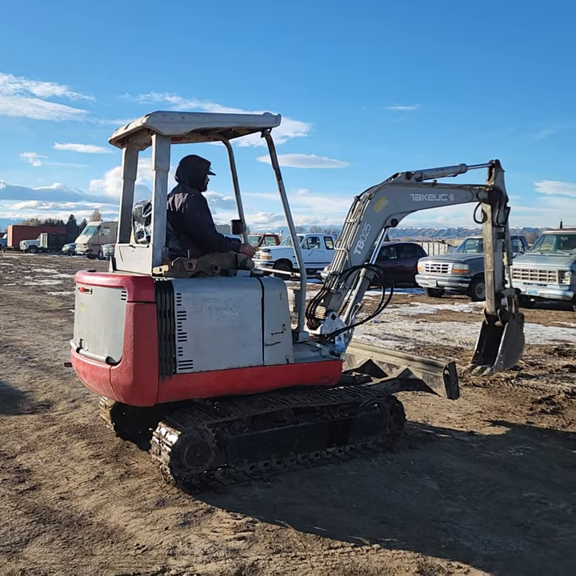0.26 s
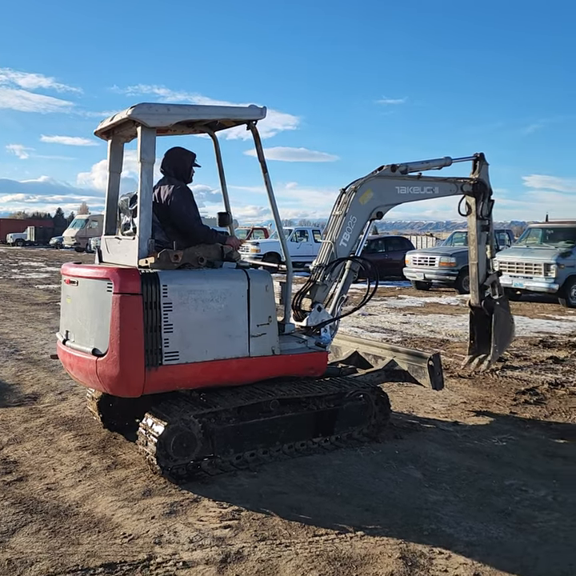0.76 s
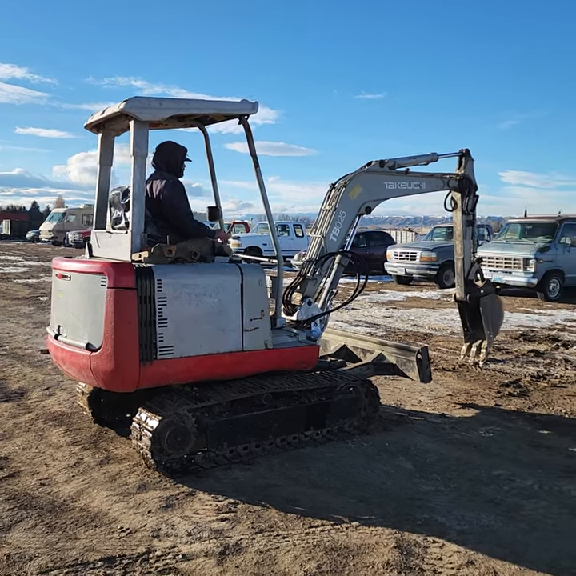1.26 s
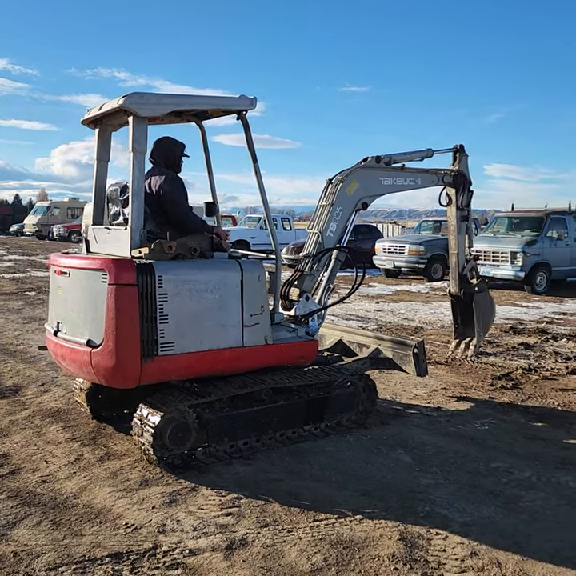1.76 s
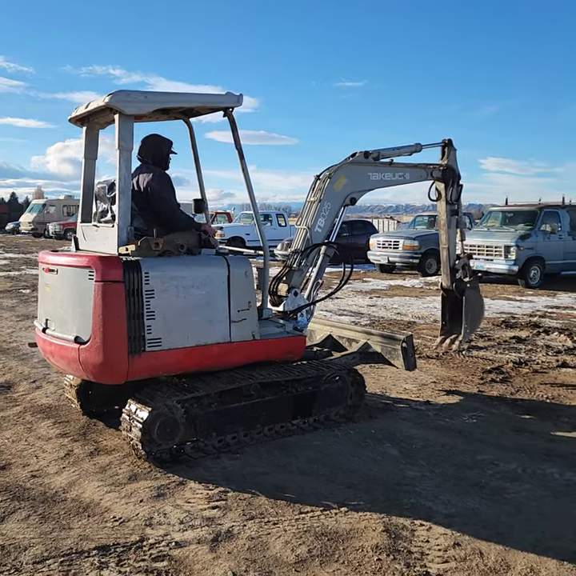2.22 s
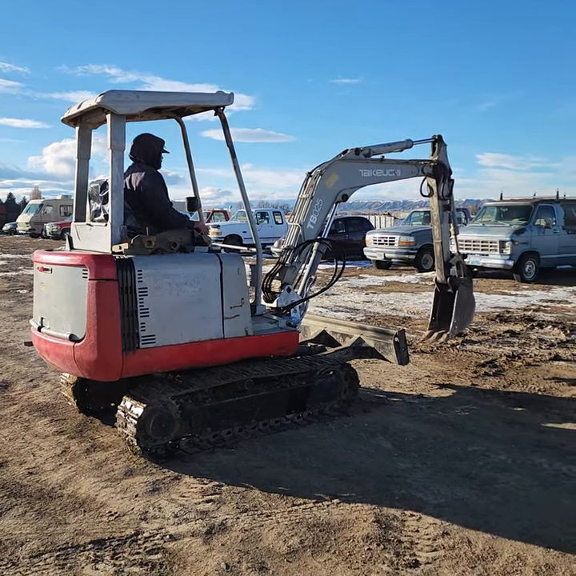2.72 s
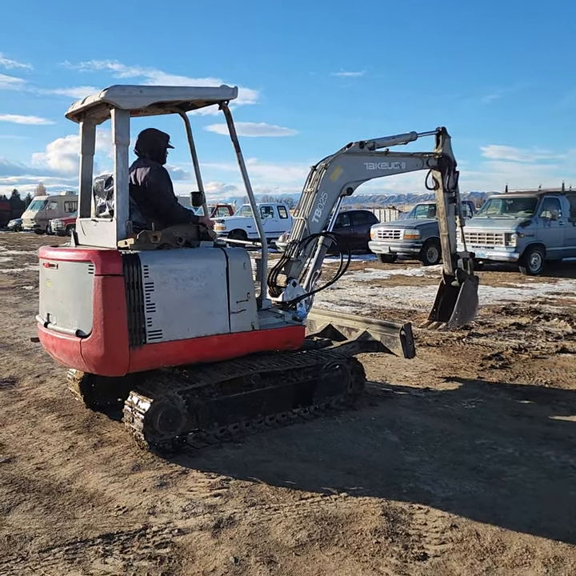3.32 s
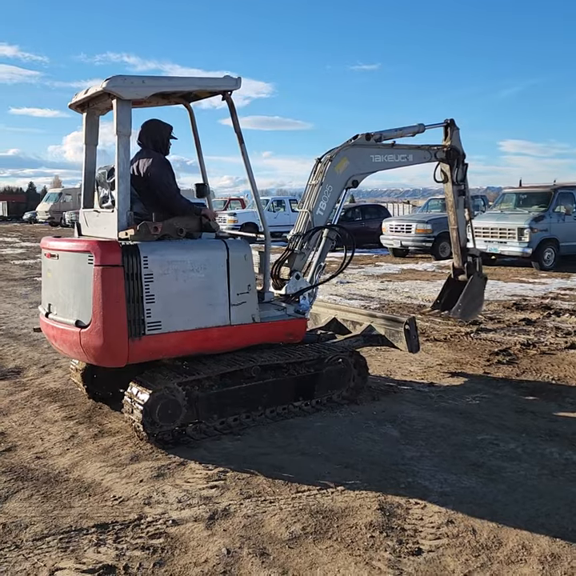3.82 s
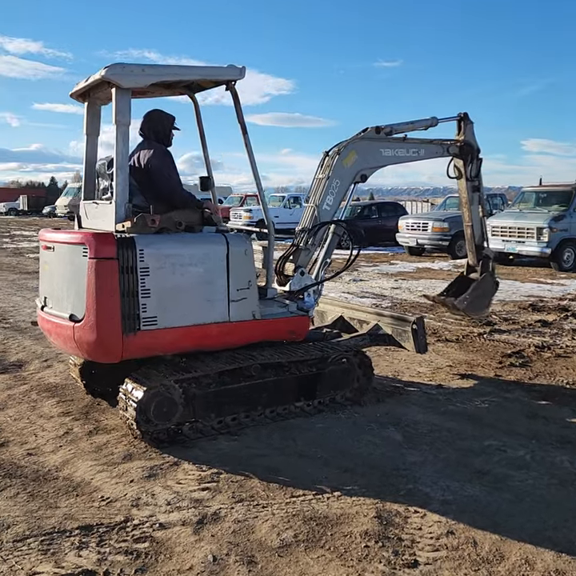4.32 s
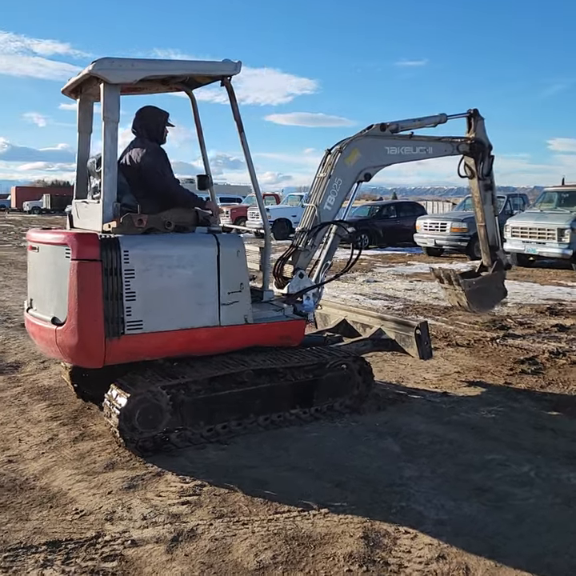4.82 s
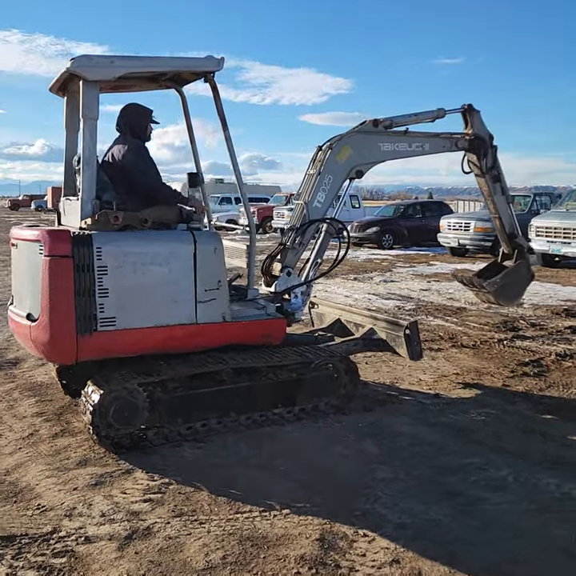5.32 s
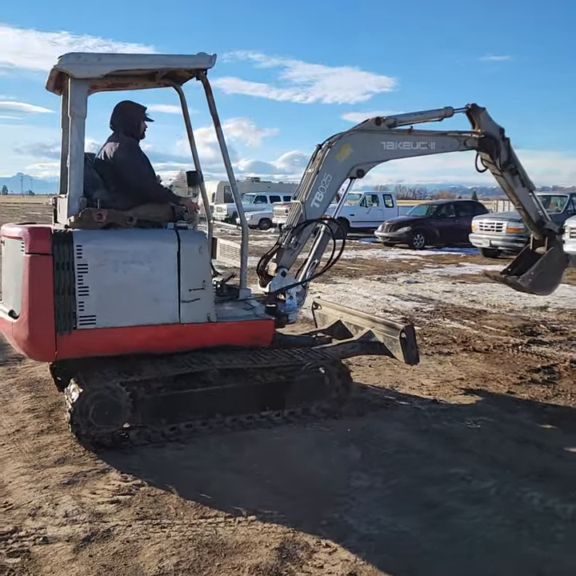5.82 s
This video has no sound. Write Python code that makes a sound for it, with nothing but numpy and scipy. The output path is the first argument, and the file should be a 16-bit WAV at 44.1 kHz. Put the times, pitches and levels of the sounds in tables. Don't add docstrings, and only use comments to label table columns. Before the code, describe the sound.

Close outdoor phone pickup of a mini excavator working at constant engine speed: fast uneven diesel knocking, ticking valves, low boom that swells and ducks, and a thin gear and pump whine. Loose arm pins click now and then, clearest around two seconds. Brief wind thumps come early; in the last stretch thick gusts pop and crackle mainly on the right.

```python
import sys
import numpy as np
from scipy import signal
from scipy.fft import rfft, irfft, next_fast_len
from scipy.io import wavfile
from scipy.ndimage import uniform_filter1d

SR = 44100
rng = np.random.default_rng(int(sys.argv[2]) if len(sys.argv) > 2 else 0)


def persist_wave(psi):
    counts = np.round(np.clip(psi, -1, 1) * 32767).astype(np.int16)
    wavfile.write(sys.argv[1], SR, np.atleast_2d(counts).T)


def gain_from_db(level_db):
    decades = np.asarray(level_db, float) / 20
    return 10 ** decades


N = 267687
SIZE = next_fast_len(N + 8192)
HZ = np.maximum(np.arange(SIZE // 2 + 1) * SR / SIZE, 1)

# (time [s], speed [four-stroke cycles/s])
ENGINE_SPEED = [(0, 20.76), (.5, 20.78), (.7, 20.85), (1.3, 20.86), (1.6, 21.33), (1.85, 20.87),
                (3.05, 20.88), (3.3, 20.76), (3.55, 20.89), (4.65, 20.92), (4.9, 20.78), (5.3, 20.8),
                (5.55, 20.85), (5.75, 20.74), (6.07, 20.74)]
START_CYCLE = .81
# (time [s], boom passed [dB])
FILTER_OPENING = [(0, -19.5), (.74, -16.5), (1.25, -15.5), (1.5, -12), (1.62, -15.5), (1.7, -20),
                  (1.91, -17), (2.18, -21.5), (2.45, -14.5), (3.01, -24.5), (3.23, -17.5), (3.77, -17),
                  (4.36, -25), (4.56, -16), (4.85, -13.5), (5.3, -13), (5.46, -14.5), (6.07, -16)]
# (deepest time [s], depth [dB], half length [s])
FILTER_DUCKS = [(.01, -3, .1), (0.38, -6, 0.078), (0.575, -6, 0.043), (.84, -2.5, .08), (1.085, -7, 0.057),
                (1.317, -8, 0.024), (1.43, -4.5, 0.093), (1.54, -4, 0.047), (1.973, -5, 0.04),
                (2.13, -8, 0.038), (2.298, -6, .1), (2.527, -5, 0.08), (2.704, -7, 0.11),
                (2.917, -3.5, 0.069), (3.13, -7.5, 0.11), (3.3, -9.5, 0.053), (3.5, -8, .13),
                (3.7, -5.5, 0.055), (3.877, -9, 0.071), (3.974, -3.5, 0.059), (4.19, -8, 0.14),
                (4.388, -9, 0.023), (4.605, -5, 0.036), (4.765, -4.5, 0.096), (4.95, -6, 0.12),
                (5.14, -4, 0.16), (5.4, -3, .05), (5.554, -1.5, .11), (5.708, -10, 0.037),
                (5.934, -1.5, 0.083)]
# (order [per cycle], level against the boom [dB])
EXHAUST_TONES = [(3, -50.5), (5, -22.5), (6, -0.5), (7, -33), (9, -16.5), (12, -30.5)]
# (time [s], clatter [dB], ticks against it [dB])
CLATTER_LEVELS = [(0, -31.5, -9), (1.4, -31, -9.5), (1.76, -33.5, -9), (2.2, -32, -11), (2.95, -33.5, -9.5),
                  (3.6, -32, -9), (4.3, -32, -11.5), (4.82, -31, -11.5), (5.12, -32, -10), (5.3, -32, -10.5),
                  (5.75, -34.5, -10.5), (6.07, -34, -11.5)]
# (place [0-1 of cycle], knock [dB], tick [dB])
CYCLE_BLOWS = [
    (.15, 1, -1.5),
    (.43, 7, 2),
    (.53, 5.5, -4.5),
    (.70, 2.5, -14),
    (0.8, 0.5, 1),
    (0.959, -7.5, -9.5),
]
BLOW_RINGS = [96, 93, 86, 89, 98, 78]
RING_HABIT = .04
KNOCK_MEMORY, TICK_MEMORY = .36, .2
LOUDEST = 1.6
# (frequency [Hz], level [dB per Hz])
BONNET_TONE = [(140, -56.5), (230, -9.5), (358, -7), (387, -8.5), (504, -1.5), (638, -9), (1370, -13),
               (1860, -9), (2400, -21), (3120, -56), (5280, -120)]
# (frequency [Hz], width [Hz], level [dB])
BONNET_PANELS = [(508, 110, -6.5), (930, 110, 5), (1163, 200, 3), (1410, 43, -1.5), (1847, 160, -3),
                 (2057, 160, 4.5)]
# (frequency [Hz], level [dB per Hz])
TICK_TONE = [(1410, -19), (2400, -1.5), (2720, -3), (3090, 0), (3680, -5), (4170, -5.5), (5130, -8.5),
             (7030, -7), (7670, -5), (8640, -10), (10000, -20), (11000, -20), (12200, -15), (15100, -19),
             (15900, -16.5)]
HISS_DB = -52.5
SWING_S, SHADE_DB_PER_S = 4.66, -6
WHINE_ORDERS = [17, 20, 21, 23, 24, 25, 26, 27, 28, 33, 36, 40, 43, 45, 48, 49, 54, 56, 57, 58, 60, 72, 77,
                86, 88, 93, 96]
WHINE_LEVELS = [-13, -12.5, -11, -14, -3, -9.5, -14, -11.5, -14.5, -15.5, -13.5, -12.5, -17.5, -21.5, -18.5,
                -16.5, -16.5, -12, -10, -15, -14, -20, -19.5, -11, -14.5, -15.5, -13.5]
# (frequency [Hz], left minus right [rad])
PORT_PHASE = [(20, 0), (130, -.08), (950, .2), (1460, -.3), (2330, 1.7), (3450, 2.6), (4310, 4.9),
              (5000, 6.2), (6290, 6.8), (15600, 7.8)]
# (frequency [Hz], left minus right [dB])
PORT_BALANCE = [(60, -3), (200, 0.5), (700, 0.5), (1290, -0.5), (2380, -3), (4400, 3.5), (8120, 1.5),
                (15000, 5.5)]
# (frequency [Hz], share common to both ports [0-1])
DIRECT_SHARE = [(100, 0.32), (300, 0.63), (600, 0.76), (1200, 0.71), (2200, 0.38), (4000, 0.47),
                (8000, 0.075), (15000, .25)]
# (time [s], rumble [dB])
BREEZE = [(0.0, -31), (0.05, -31), (1.28, -29), (1.6, -18.5), (1.74, -28.5), (2.21, -31), (2.3, -32),
          (2.36, -34.5), (4.63, -32), (4.87, -25.5), (4.9, -27.5), (5.34, -26), (6.05, -24.5), (6.07, -15)]
# (frequency [Hz], level [dB per Hz])
RUMBLE_TONE = [(15, 7), (30, -2), (60, 10.5), (95, 15.5), (160, 10.5), (230, -1.5), (400, -46)]
RUMBLE_SWAY_DB = 1
# (time [s], peak [dB], ring [Hz], left minus right [dB], decay [ms])
PIN_KNOCKS = [(.9364, -26, 12500, -6, 1.), (2.077, -36, 2900, -13, 22), (2.0965, -17, 2200, -11.5, 5),
              (2.1034, -18, 3300, -6, 2.5), (2.108, -29, 3300, -8, 9), (2.635, -30, 3200, 9, 9),
              (2.66, -33, 3000, 5, 8), (3.6711, -30, 7500, -7, 3), (3.6705, -33, 13000, 3, 2),
              (3.695, -23, 4200, 8, 1.7), (5.122, -27, 4800, 11, 3.6), (5.11, -27, 3200, 7, 9),
              (5.157, -31, 3040, 7, 32), (5.159, -28, 4000, 6, 16), (5.325, -24, 3900, 4, 9.1),
              (5.338, -25, 3000, 5, 11), (5.567, -33, 3100, 6, 32), (5.6894, -34, 3780, -1, 5),
              (5.7444, -36, 3200, 11, 6.5)]
RING_WIDTH_HZ, RING_KNEE_MS = 4200, 3.7
# (time [s], hold [s], buffeting [dB], left minus right [dB], scratch [dB])
GUST_PUFFS = [(1.29, .14, -32, -7, -36), (1.517, .01, -23, 3, -29), (1.59, .01, -19.5, 9, -23),
              (3.85, .01, -25, 1, -28), (4.79, 0.041, -29, -13, -27), (4.865, .005, -23, -3, -38),
              (5.301, .01, -17, -17, -21), (5.345, .02, -16, -11, -29), (5.42, .015, -22.5, -22, -24),
              (5.46, .03, -26, -27, -28.5), (5.553, 0.0092, -25.5, -33.5, -33),
              (5.607, 0.027, -21.5, -9, -38), (5.673, 0.068, -23.5, -14, -37), (5.78, 0.095, -26, -13, -40),
              (5.917, 0.11, -25, -4, -40)]
PUFF_RISE_DB_PER_S, PUFF_FALL_DB_PER_S = 450, 400
# (frequency [Hz], level [dB per Hz])
BUFFET_TONE = [(20, -39), (60, 2), (130, 5), (270, -11), (450, -10), (800, -19), (1600, -68), (6000, -120)]
# (frequency [Hz], level [dB per Hz])
SCRATCH_TONE = [(100, -43), (350, -25), (600, -4.5), (1000, -9), (1400, -12), (2200, -35), (6000, -120)]
# (time [s], peak [dB], left minus right [dB], pitch [Hz])
EDDY_POPS = [(1.513, -7.5, 12, 300), (1.597, -9, 19, 330), (1.63, -5.5, 7, 73), (2.285, -20, -4, 45),
             (2.49, -23, 0, 45), (3.85, -21, 3, 250), (4.23, -28, 0, 45), (4.72, -32, 2, 60),
             (4.80, -13, -18, 400), (4.845, -5.5, 18, 70), (5.226, -17, -25, 1100),
             (5.253, -9.5, -22, 1000), (5.266, -7, -20, 500), (5.282, -3.5, -20, 660),
             (5.29, -12.5, -3, 60), (5.304, -2.5, -29, 835), (5.343, -13, -20, 450),
             (5.356, -5.5, -20, 710), (5.371, -17, -20, 600), (5.397, -9, -23, 650),
             (5.435, -5.5, -20, 600), (5.46, -7, -24, 714), (5.489, -11, -20, 550), (5.52, -10, -21, 418),
             (5.556, -10, -24, 250), (5.675, -7.5, -24, 456), (5.72, -10, -20, 700), (5.775, -4, -10, 70)]


def on_hz(table):
    hz, value = np.transpose(table)
    return np.interp(np.log(HZ), np.log(np.maximum(hz, 1)), value)


def on_time(table):
    s, *columns = np.transpose(table)
    return [np.interp(np.arange(N) / SR, s, column) for column in columns]


def through(x, response):
    return irfft(rfft(x, SIZE) * response, SIZE)[..., :N]


def causal(db):
    cepstrum = irfft(db * np.log(10) / 20, SIZE)
    cepstrum[1:SIZE // 2] *= 2
    cepstrum[SIZE // 2 + 1:] = 0
    return np.exp(rfft(cepstrum))


def unit(x):
    return x / np.sqrt(np.mean(x ** 2))


def waver(db, rate, to=gain_from_db):
    steps = np.repeat(rng.standard_normal(int(N / SR * rate) + 2), 8)
    slow = 0.64 * uniform_filter1d(uniform_filter1d(steps, size=8), size=8)
    return np.interp(np.arange(N) * rate * 8 / SR, np.arange(len(slow)), to(db * slow))


def port_lead():
    side = np.array([[.5], [-.5]])
    return gain_from_db(side * on_hz(PORT_BALANCE)) * np.exp(1j * side * on_hz(PORT_PHASE))


def ports(sources, body):
    share = np.clip(on_hz(DIRECT_SHARE), 0, 1)
    common, *own = rfft(sources, SIZE) * body
    lead = port_lead()
    direct = np.sqrt(share) * common * lead
    scattered = np.sqrt(1 - share) * np.array(own) * abs(lead)
    return unit(irfft(direct + scattered, SIZE)[:, :N])


def wind_filter():
    t = np.arange(N) / SR
    ducks = sum(db * np.maximum(1 - abs(t - s) / half, 0) for s, db, half in FILTER_DUCKS)
    return on_time(FILTER_OPENING)[0] + ducks


def tones(cycle, orders, wobble_db, rate, slip):
    total = 0
    for order, db in orders:
        level = gain_from_db(db) * waver(wobble_db, rate) * np.sqrt(2)
        angle = 2 * np.pi * (round(order) * cycle + rng.random())
        total = total + level * np.sin(angle + waver(slip * order, rate, to=np.positive))
    return total


def exhaust_boom(cycle, boom_db):
    return gain_from_db(boom_db) * tones(cycle, EXHAUST_TONES, wobble_db=-0.8, rate=19, slip=0.01)


def rattle(cycle, memory, size=2112):
    turns = rng.standard_normal((3, int(cycle[-1]) + 2, size))
    turns = signal.lfilter([np.sqrt(1 - memory ** 2)], [1, -memory], turns, axis=1)
    return turns.reshape(3, -1)[:, (cycle * size).astype(int)]


def bursts(cycle, sizes_db, rise, decay, scatter_db, bed, jitter, repeat, memory):
    gate, habit = bed, 0
    for (place, *_), db, order in zip(CYCLE_BLOWS, sizes_db, BLOW_RINGS):
        size, late = rng.standard_normal((int(cycle[-1]) + 3, 2)).T
        since_start = cycle + 1 - place
        turn, since = since_start.astype(int), since_start % 1
        strength = gain_from_db(db + scatter_db * np.clip(size, -3, LOUDEST))[turn]
        burst = strength * (np.exp(-since / decay) - np.exp(-since / min(rise, .8 * decay)))
        habit = habit + burst * np.sin(2 * np.pi * order * (since + jitter * late[turn]))
        gate = gate + burst
    fresh = rattle(cycle, memory) * gate
    same = unit(habit) * np.std(fresh[0])
    fresh[0] = np.sqrt(1 - repeat) * fresh[0] + np.sqrt(repeat) * same
    return fresh


def clatter(cycle, clatter_db, treble_db, duck_db):
    _, knock_db, tick_db = np.transpose(CYCLE_BLOWS)
    panels = sum(db / (1 + (2 * (HZ - hz) / width) ** 2) for hz, width, db in BONNET_PANELS)
    knock = bursts(cycle, knock_db, rise=0.042, decay=0.069, scatter_db=0.5, bed=0.88, jitter=0.0012,
                   repeat=RING_HABIT, memory=KNOCK_MEMORY)
    knock = ports(knock, causal(on_hz(BONNET_TONE + [(6000, -77)]) + panels))
    knock = knock + (gain_from_db(duck_db) - 1) * through(knock, 1 / (1 + (HZ / 330) ** 6))
    ticks = bursts(cycle, tick_db, rise=0.033, decay=0.063, scatter_db=4.5, bed=0.45, jitter=0.0026,
                   repeat=0, memory=TICK_MEMORY)
    ticks = ports(ticks, causal(on_hz([(600, -105)] + TICK_TONE)))
    hiss = through(ticks, 1 / (1 + (9500 / HZ) ** 12))
    hiss_db = HISS_DB + SHADE_DB_PER_S * np.maximum(np.arange(N) / SR - SWING_S, 0)
    lower_ticks = gain_from_db(clatter_db + treble_db + 2.0) * (ticks - hiss)
    return gain_from_db(clatter_db + 2.0) * knock + lower_ticks + gain_from_db(hiss_db + 11.0) * hiss


def whine(cycle, clatter_db):
    orders = zip(WHINE_ORDERS, WHINE_LEVELS)
    return gain_from_db(clatter_db - 2.5) * tones(cycle, orders, wobble_db=3.5, rate=15, slip=0.02)


def wind_rumble(rumble_db, alike=0.94):
    both, *own = rng.standard_normal((3, N))
    air = np.sqrt(alike) * both + np.sqrt(1 - alike) * np.array(own)
    rumble = unit(through(air, gain_from_db(on_hz(RUMBLE_TONE))))
    return gain_from_db(rumble_db + 4.5) * waver(RUMBLE_SWAY_DB, 7.4) * rumble


def pin_knocks(grit=0.5):
    out, t = np.zeros((2, N + 4096)), np.arange(2048) / SR
    for s, db, hz, pan_db, ms in PIN_KNOCKS:
        width = RING_WIDTH_HZ / (1 + (ms / RING_KNEE_MS) ** 1.24)
        edges = np.clip([hz - width / 2, hz + width / 2], 300, .45 * SR)
        blow = grit * rng.standard_normal(len(t)) * np.exp(-t * 1000 / ms)
        blow[0] = 1 / (1 + ms / RING_KNEE_MS)
        ring = signal.butter(2, edges, "band", fs=SR, output="sos")
        burst = signal.sosfilt(ring, blow)
        burst = burst / abs(burst).max() * gain_from_db(db)
        at = int(s * SR)
        out[0, at:at + len(t)] += burst * gain_from_db(pan_db / 2)
        out[1, at + 6:at + 6 + len(t)] += burst * gain_from_db(-pan_db / 2)
    return out[:, :N]


def wind_gusts(pop_db=4.0, leak=0.12, calm_db=-32.0):
    crackle = unit(np.array([waver(pop_db, 90) * rng.standard_normal(N) for _ in range(2)]))
    t, buffet, scratch = np.arange(N) / SR, 0, 0
    for s, hold, db, pan_db, scratch_db in GUST_PUFFS:
        rise_db = np.minimum(PUFF_RISE_DB_PER_S * (t - s), 0)
        fall_db = np.minimum(PUFF_FALL_DB_PER_S * (s + hold - t), 0)
        puff_db = rise_db + fall_db
        port = gain_from_db(np.array([[pan_db], [-pan_db]]) / 2)
        buffet = buffet + port * gain_from_db(db + puff_db)
        scratch = scratch + port * np.maximum(gain_from_db(scratch_db + puff_db) - gain_from_db(calm_db), 0)
    gusts = through(crackle * buffet, causal(on_hz(BUFFET_TONE))) * gain_from_db(19.0)
    gusts = gusts + through(crackle * scratch, causal(on_hz(SCRATCH_TONE))) * gain_from_db(11.0)
    return gusts + leak * gusts[::-1]


def eddy_pops(cycles=0.96):
    out, t = np.zeros((2, N)), np.arange(-2048, 2048) / SR
    for s, db, pan_db, hz in EDDY_POPS:
        swell = gain_from_db(db) * np.exp(-(t * hz / cycles) ** 2 * 2)
        swing = swell * np.cos(2 * np.pi * (hz * t + rng.random()))
        at = int(s * SR)
        out[:, at - 2048:at + 2048] += swing * gain_from_db(np.minimum([[pan_db], [-pan_db]], 0))
    return out


def scene():
    cycle = START_CYCLE + np.cumsum(on_time(ENGINE_SPEED)[0]) / SR
    boom_db = wind_filter()
    clatter_db, ticks_db = on_time(CLATTER_LEVELS)
    duck_db = 0.67 * (uniform_filter1d(boom_db, size=9000) + 14.5)
    steady_tones = through(exhaust_boom(cycle, boom_db) + whine(cycle, clatter_db), port_lead())
    engine = steady_tones + clatter(cycle, clatter_db, ticks_db, duck_db)
    wind = wind_rumble(on_time(BREEZE)[0] - 2.5) + wind_gusts() + eddy_pops()
    return engine + pin_knocks() + wind


def band_limit(x):
    return signal.sosfilt(signal.butter(12, 16030, fs=SR, output="sos"), x)


def record(dry):
    rounded = np.tanh(1.09 * dry) / 1.083 * 1.066
    return band_limit(rounded)


dry = scene()
out = record(dry)
persist_wave(out)
```